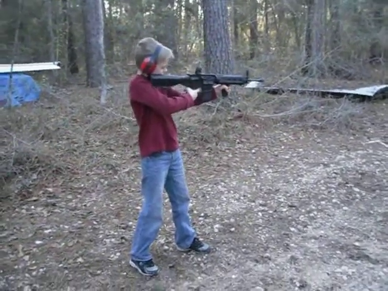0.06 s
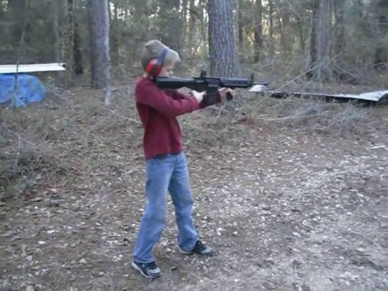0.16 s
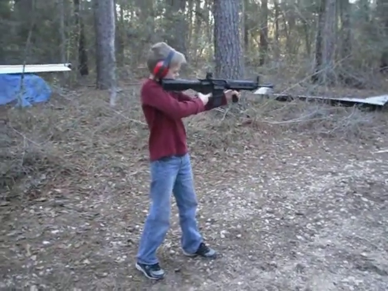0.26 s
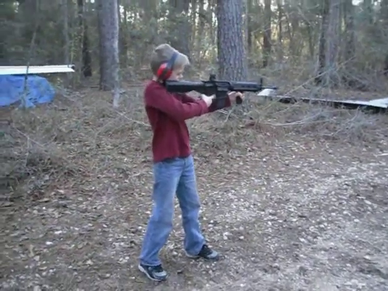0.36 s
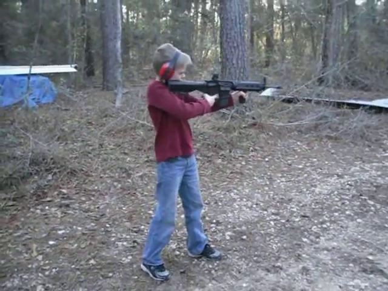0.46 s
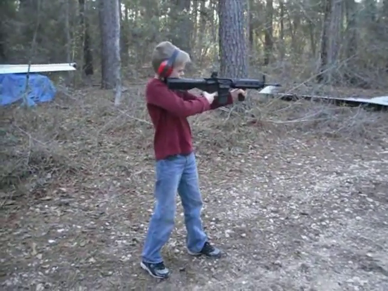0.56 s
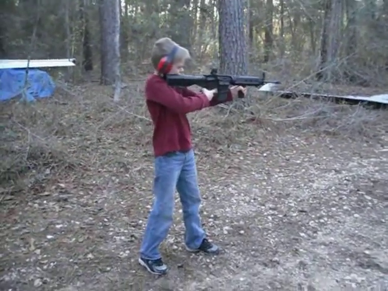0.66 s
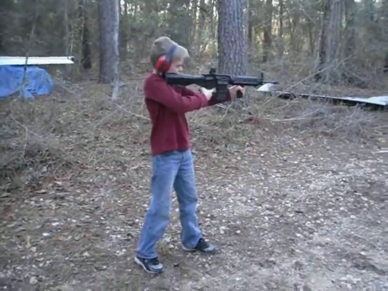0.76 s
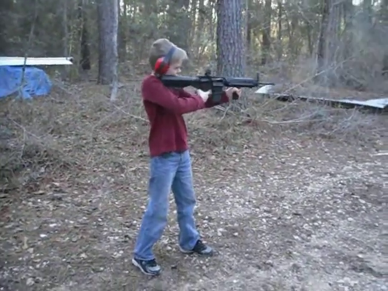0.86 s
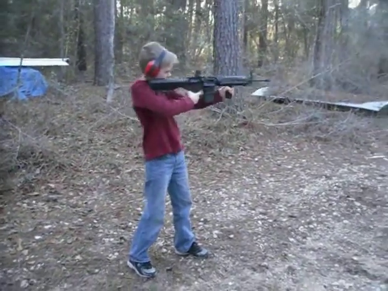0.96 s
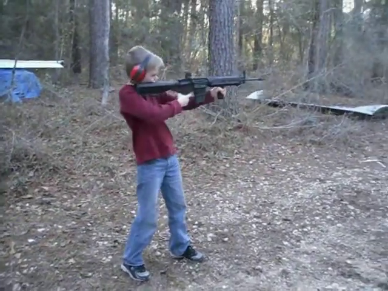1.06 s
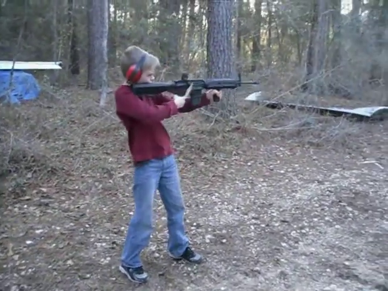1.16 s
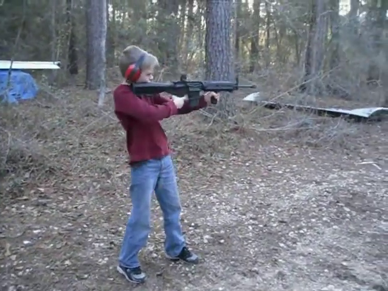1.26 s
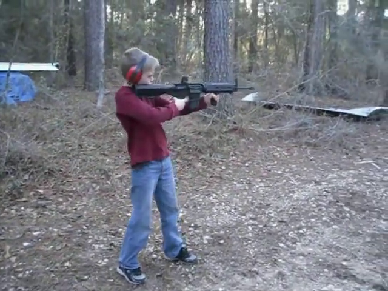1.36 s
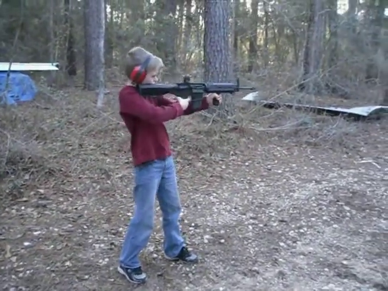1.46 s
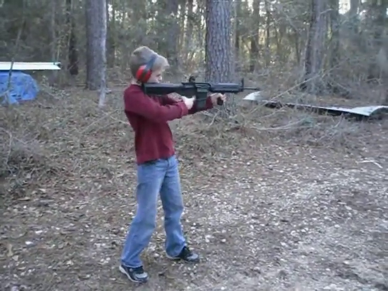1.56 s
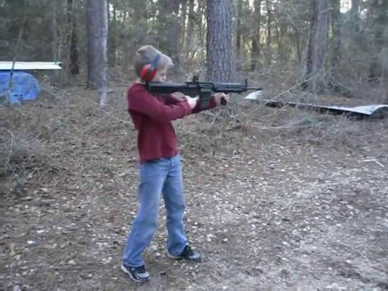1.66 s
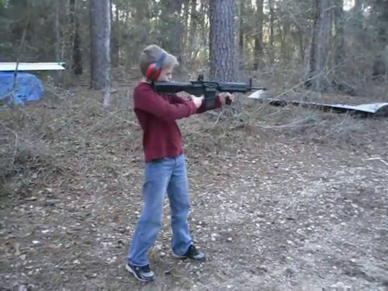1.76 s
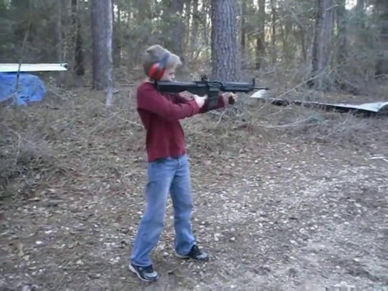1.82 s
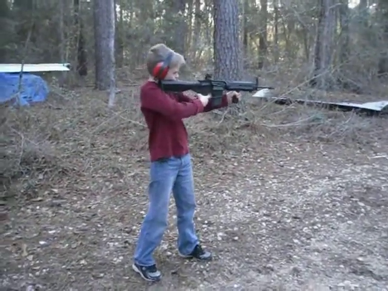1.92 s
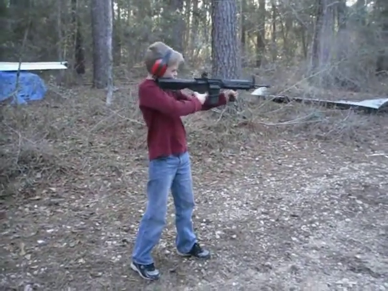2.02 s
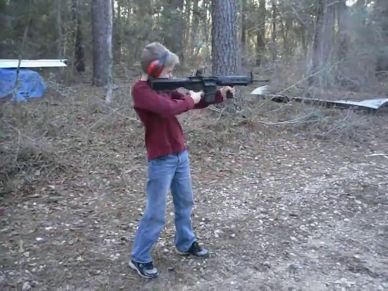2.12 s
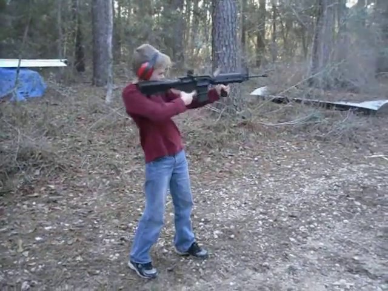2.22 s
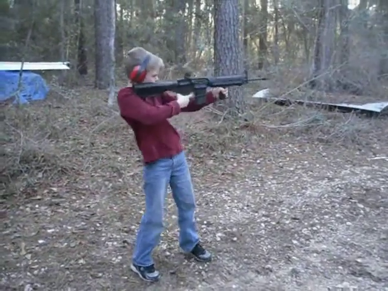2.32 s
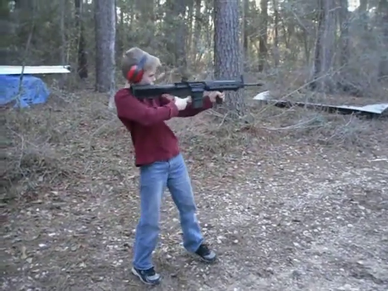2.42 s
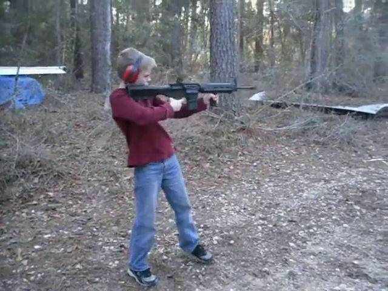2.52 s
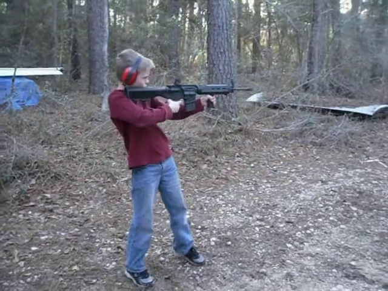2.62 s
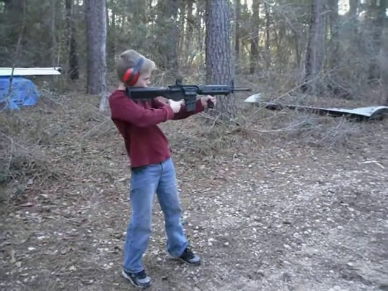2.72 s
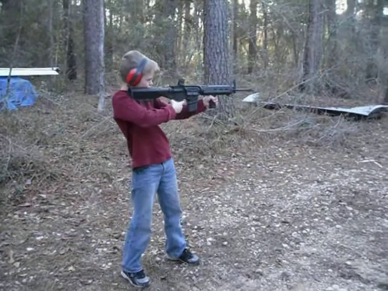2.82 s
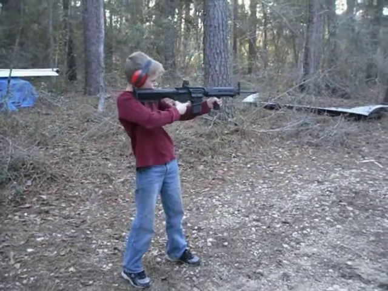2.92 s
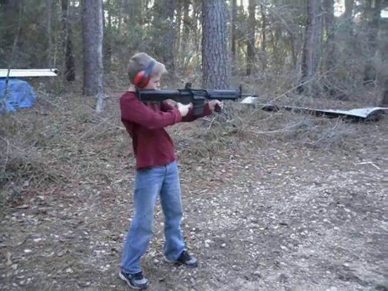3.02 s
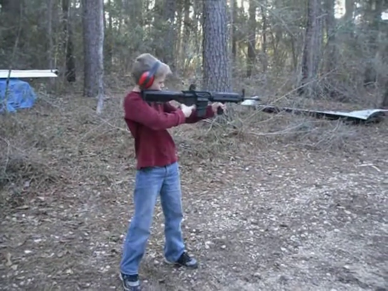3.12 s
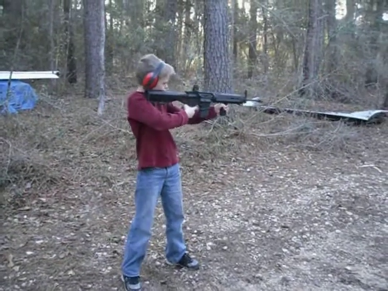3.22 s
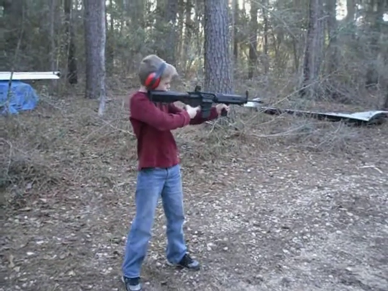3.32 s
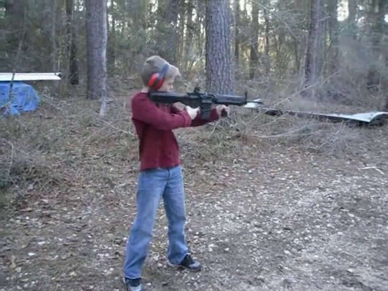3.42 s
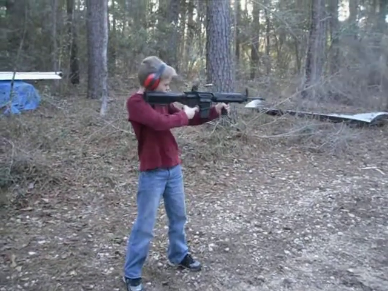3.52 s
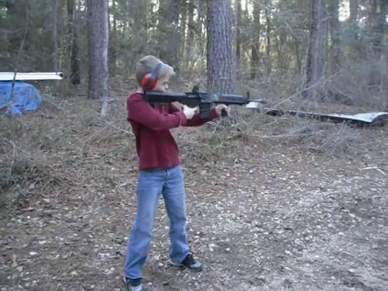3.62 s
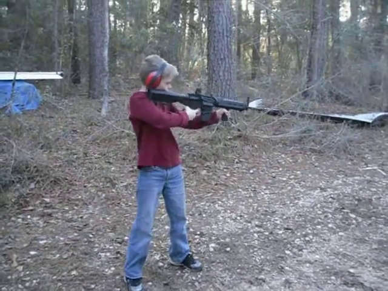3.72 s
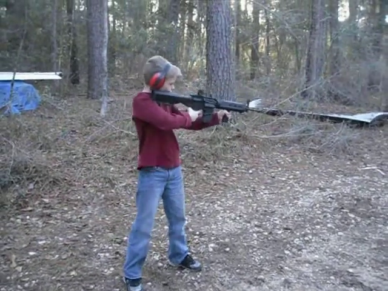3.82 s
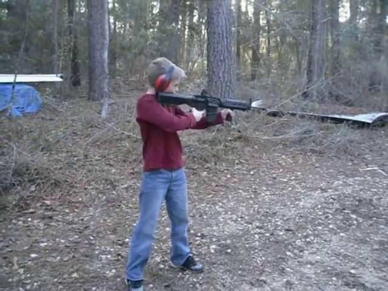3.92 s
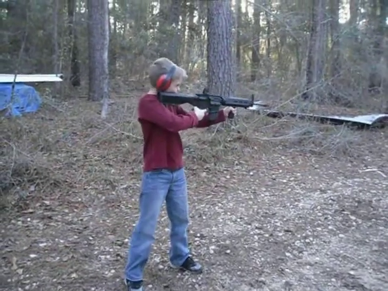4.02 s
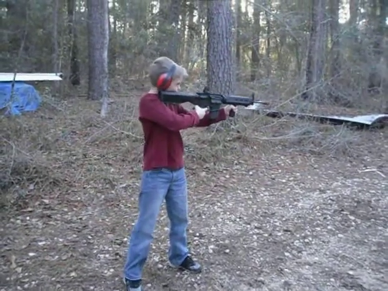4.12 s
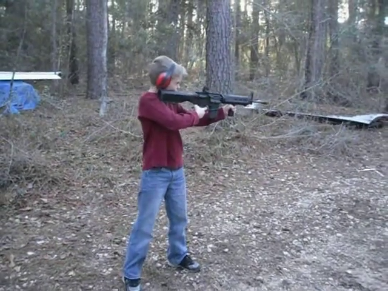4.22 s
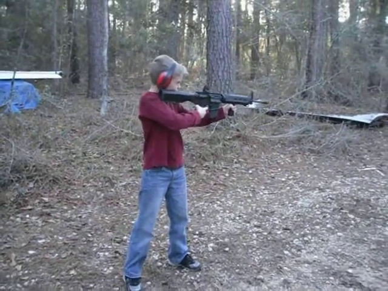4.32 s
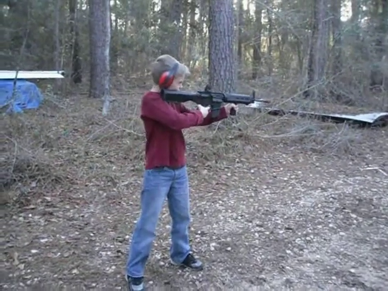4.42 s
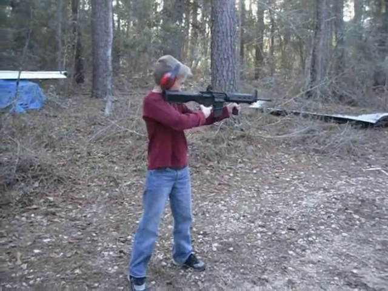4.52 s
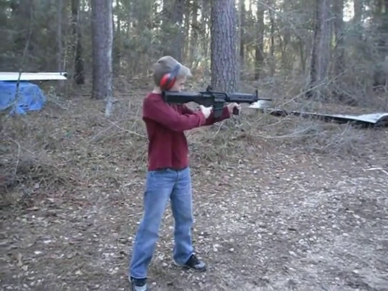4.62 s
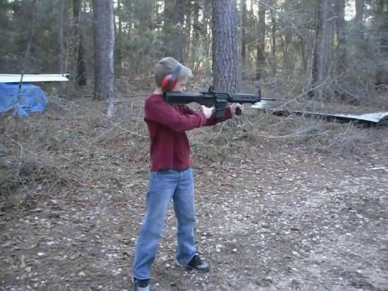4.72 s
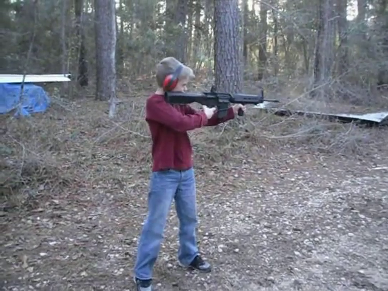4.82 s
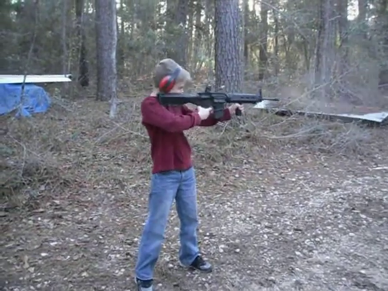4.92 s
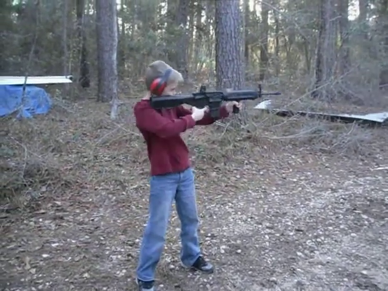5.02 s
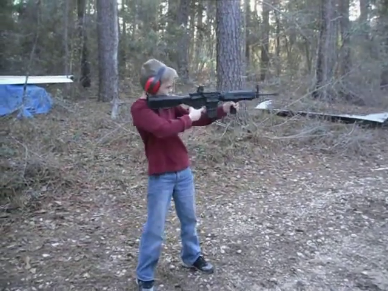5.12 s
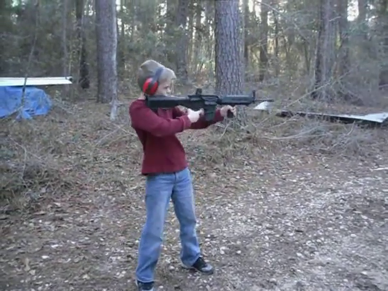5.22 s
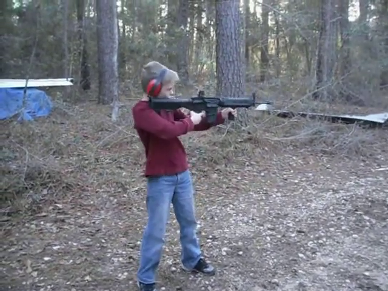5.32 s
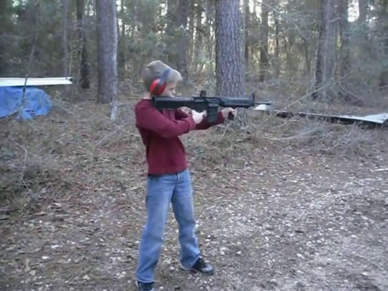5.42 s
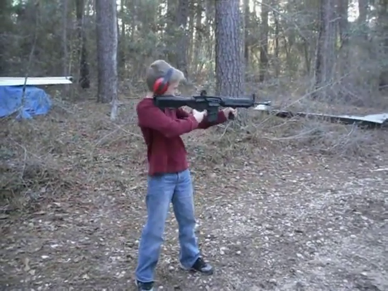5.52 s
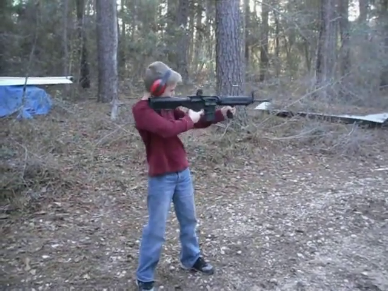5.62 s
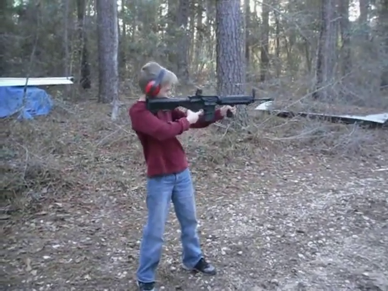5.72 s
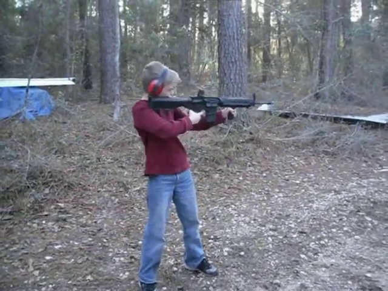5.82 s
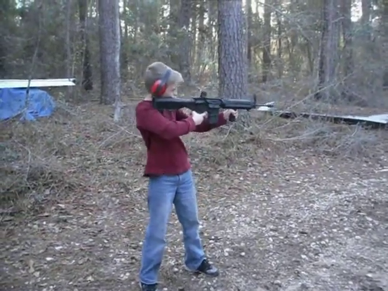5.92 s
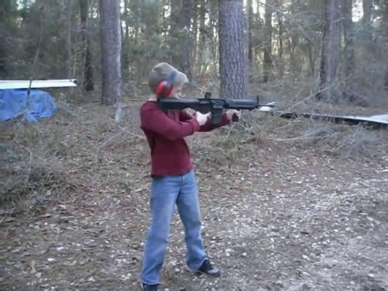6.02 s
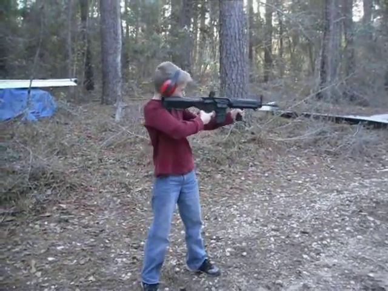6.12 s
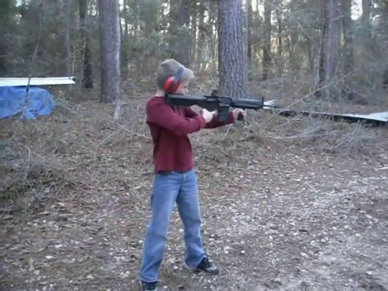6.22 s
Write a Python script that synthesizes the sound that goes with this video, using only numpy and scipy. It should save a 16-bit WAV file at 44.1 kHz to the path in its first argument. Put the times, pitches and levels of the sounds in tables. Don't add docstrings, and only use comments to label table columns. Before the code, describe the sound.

Close, clipped rifle cracks in rapid pairs and one triple, rolling echoes through trees, and spent cases ticking in dry leaves between bursts.

```python
import sys
import numpy as np
from scipy import signal
from scipy.fft import rfft, irfft, next_fast_len
from scipy.io import wavfile
from scipy.ndimage import uniform_filter1d

SR = 44100
rng = np.random.default_rng(int(sys.argv[2]) if len(sys.argv) > 2 else 0)


def output_pcm(signal):
    pcm = np.clip(np.atleast_2d(signal).T, -1, 1) * 32767
    wavfile.write(sys.argv[1], SR, np.round(pcm).astype(np.int16))


def invert_db(x):
    u = np.asarray(x, float) / 20
    return 10 ** u


N = 276507

# t/s, strength level/dB, brightness of the echo/dB
SHOTS = [(0.7896, -0.5, -1), (.881, 0, 0), (1.967, -1, 1), (2.059, 2.5, 2), (2.150, -1, 4), (3.35, 0, 0.5),
         (3.437, -0.5, 0), (4.7931, 0, 0.5), (4.884, 0, -0.5), (5.473, 1, -1.5), (5.558, -0.5, 0)]


def along(hz, values, at):
    return np.interp(np.log(at + 1), np.log(np.asarray(hz) + 1), values)


def filtered(x, response):
    m = next_fast_len(x.shape[-1] + 8192)
    spectrum = rfft(x, m) * response(np.fft.rfftfreq(m, 1 / SR))
    return irfft(spectrum, m)[..., :x.shape[-1]]


def add(track, s, sound):
    part = track[round(s * SR):][:len(sound)]
    part += sound[:len(part)]


def fading(table, t60, hz, t):
    start_db = along(*np.transpose(table), hz)[:, None]
    return invert_db(start_db - 60 * t / t60[:, None]) ** 2


def saturated(x, top, hard):
    return x / (1 + np.abs(x / top) ** hard) ** (1 / hard)


def air():
    # f/Hz, level/dB per Hz
    hush_spectrum = [(20, -18.5), (80, -1), (467, -3.5), (724, -2), (1360, -9), (6820, -14.5), (8500, -9),
                     (11000, -57)]
    f, db = np.transpose(hush_spectrum)

    def hush_and_tone(hz):
        tone = invert_db(2.5) / (1 + ((hz - 720) / 11) ** 2)
        return invert_db(along(f, db, hz)) + tone

    hush = filtered(rng.standard_normal(N), hush_and_tone)
    rumble = filtered(rng.standard_normal(N), lambda hz: 1 / (1 + (hz / 70) ** 4))
    return invert_db(-63) * hush / hush.std() + invert_db(-72.0) * rumble / rumble.std()


def cases():
    # t/s, peak level/dB, deepest tone f/Hz, t60/s
    landings = [(.048, -58, 2400, .03), (1.435, -34, 4890, .04), (1.653, -53, 5000, .03),
                (1.878, -50, 4790, .033), (2.844, -52, 5000, .03), (3.014, -46, 4000, .03),
                (4.151, -44, 4800, .04), (4.234, -24.5, 2300, 0.034), (4.3225, -44, 5570, .05),
                (4.456, -52.5, 5794, .022), (4.531, -47, 3200, 0.019), (4.585, -53, 5380, .06),
                (6.163, -36, 5496, .05), (6.231, -42, 3800, 0.0076), (6.2515, -37, 3600, 0.0076),
                (6.264, -37, 5000, .04)]
    leaf_top_hz, settle_db, settle_t60_s = 7400, -17.5, 0.13
    track, t = np.zeros(N), np.arange(SR // 5) / SR
    for s, db, hz, t60 in landings:
        fade = invert_db(-60 * t / t60) + invert_db(settle_db - 60 * t / settle_t60_s)
        onset = 1 - np.exp(-t / 0.00037)
        burst = fade * onset * rng.standard_normal(len(t))
        crunch = filtered(burst, lambda f: 1 / (1 + (hz / (f + 1)) ** 8) / (1 + (f / leaf_top_hz) ** 20))
        add(track, s - .0007, invert_db(db) * crunch / np.abs(crunch).max())
    return track


def woods():
    # f/Hz, level/dB
    near_scatter = [(50, 0.5), (110, 12.5), (200, 10.5), (420, 18.5), (865, 18.5), (1050, 10), (3300, 5),
                    (7500, 10)]
    # f/Hz, level/dB
    far_scatter = [(40, -33), (91, -16), (180, -27), (300, -11), (720, 2), (1100, -8.5), (2000, -13),
                   (3400, -19)]
    # delay t/s, bass swell/dB, middle swell/dB, spread/s
    stands = [
        (.04, 14, 7, 0.053),
        (.082, -1, -5.5, 0.041),
        (.19, -4, 0, 0.032),
        (.33, 3, 1.5, .09),
        (.53, 2.5, 1, .16),
    ]

    noise, knots = rng.standard_normal((2, len(SHOTS) + 1, 3 * SR))
    trunks = uniform_filter1d(uniform_filter1d(knots, size=90), size=90)
    grain = invert_db(1.6 * trunks / trunks.std())
    hz, t, z = signal.stft(noise * grain / np.sqrt(np.mean(grain ** 2)), SR, nperseg=512)
    f = hz[:, None]
    patches = uniform_filter1d(rng.standard_normal(z.shape), size=8, axis=1)
    patches = uniform_filter1d(patches, size=9, axis=2)
    z = z * invert_db(1.3 * patches / patches.std())
    same = 1 / (1 + (f / 700) ** 2)
    field = np.sqrt(same) * z[:1] + np.sqrt(1 - same) * z[1:]

    delay, bass_db, middle_db, spread = np.transpose(stands)
    bumps = np.exp(-((t - delay[:, None]) / spread[:, None]) ** 2)
    bass = 1 / (1 + (f / 300) ** 2)
    swell_db = bass * (bass_db @ bumps) + (1 - bass) * (middle_db @ bumps)

    near_t60_s = 0.6 / (1 + (hz / 10700) ** 3 + (30 / (hz + 20)) ** 2)
    far_t60_s = 4.41 / ((1 + hz / 500) ** 0.45 + (70 / (hz + 20)) ** 2)
    near = fading(near_scatter, near_t60_s, hz, t)
    far = fading(far_scatter, far_t60_s, hz, t)
    octaves = np.log2(np.maximum(hz / far_scatter[-1][0], 1))
    far = far * invert_db(2 * -3 * octaves)[:, None]

    echo_step_db = -10.5 / (1 + (3750 / (f + 1)) ** 20)
    gain = np.sqrt(near + far) * invert_db(swell_db + echo_step_db)
    bright = invert_db(np.array(SHOTS)[:, 2, None, None] / (1 + (1200 / (f + 1)) ** 4))
    return signal.istft(field * gain * bright, SR, nperseg=512)[1]


def rifle():
    track, t = np.zeros(N), np.arange(SR // 10) / SR
    for (s, db, _), echo in zip(SHOTS, woods()):
        rattle, fizz = rng.standard_normal((2, len(t)))
        add(track, s - .0072, invert_db(-40.5) * np.diff(rattle, prepend=0) * (t < .007))
        add(track, s - .0008, invert_db(-24.5) * np.sin(2 * np.pi * 6000 * t) * (t < .001))
        blast = invert_db(19) * (1 - t / .0008) * np.exp(-t / .0008) * (1 - np.exp(-t / .0002))
        snap = filtered(fizz, lambda hz: 1 / (1 + np.log2((hz + 1) / 4500) ** 4))
        crack_fade = invert_db(25 - 60 * t / 0.0085) + invert_db(9.5 - 60 * t / 0.091)
        crack = crack_fade * snap * (1 - np.exp(-t / 0.001))
        ground_rise = -np.sin(np.pi * np.minimum(t / 0.012, .5))
        ground = invert_db(7.5 - 60 * t / 0.075) * np.sin(2 * np.pi * 125 * t) * ground_rise
        add(track, s, invert_db(db) * (blast + crack + ground))
        build = 1 - np.exp(-np.arange(len(echo)) / SR / 0.00099)
        add(track, s, invert_db(db) * build * echo)

    def trunk(hz):
        return 1 + invert_db(-15.5) * np.exp(-2j * np.pi * hz * .01137) / (1 + (hz / 900) ** 2)

    def thin(hz):
        return (1j * hz / (45 + 1j * hz)) ** 2

    return filtered(track, lambda hz: trunk(hz) * thin(hz))


def scene():
    return (air() + cases() + rifle())[None]


def top_cut(x):
    return signal.sosfilt(signal.butter(12, 16950, fs=SR, output="sos"), x)


def record(dry):
    # f/Hz, level/dB
    band_edge = [(7200, 0.5), (7700, -3), (8200, -13.5), (8900, -20), (9400, -68)]
    flat = saturated(dry, top=0.7, hard=9.6)
    narrow = filtered(flat, lambda hz: invert_db(along(*np.transpose(band_edge), hz)))
    squared = saturated(narrow, top=0.73, hard=44)

    def sag(hz):
        slow = invert_db(-29.5) / (1 + 2j * np.pi * hz * .12) ** 2
        quick = invert_db(-35.0) / (1 + 2j * np.pi * hz * 0.023) ** 2
        return slow - quick

    overload = 1. * (np.abs(dry) > .72)
    biased = squared + filtered(overload, sag)
    finished = filtered(biased, lambda hz: 1 / (1 + (hz / 16000) ** 220))
    return top_cut(finished)


dry = scene()
out = record(dry)
output_pcm(out)
```